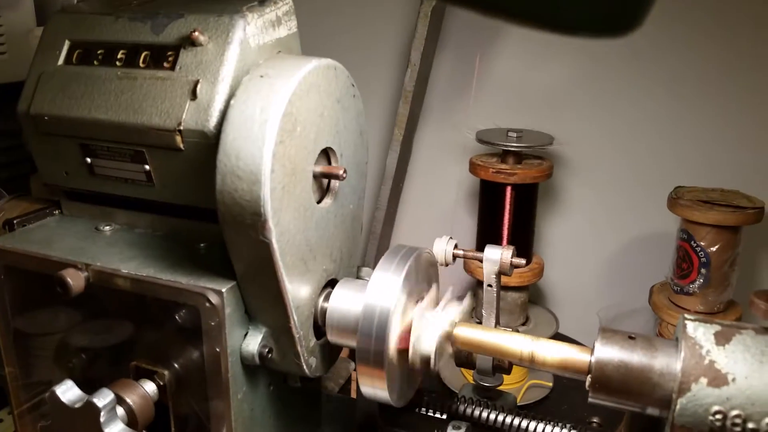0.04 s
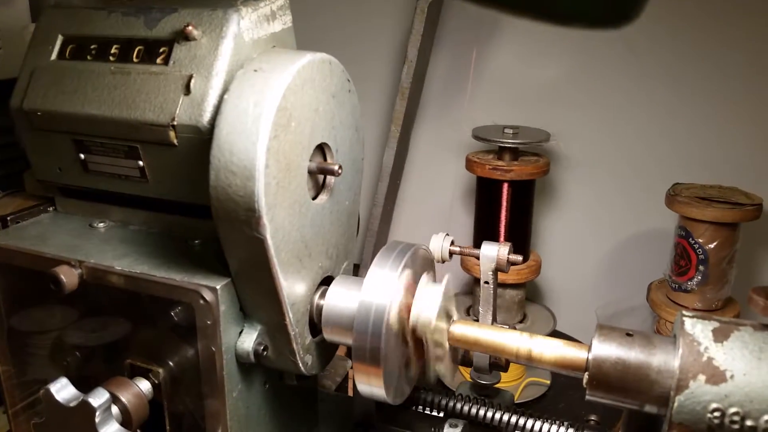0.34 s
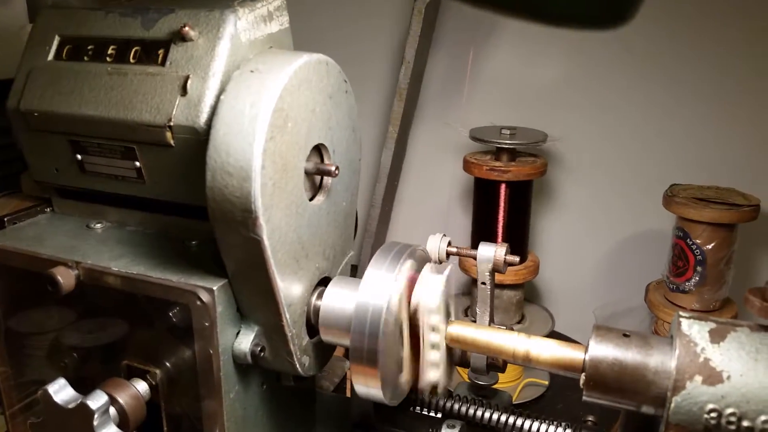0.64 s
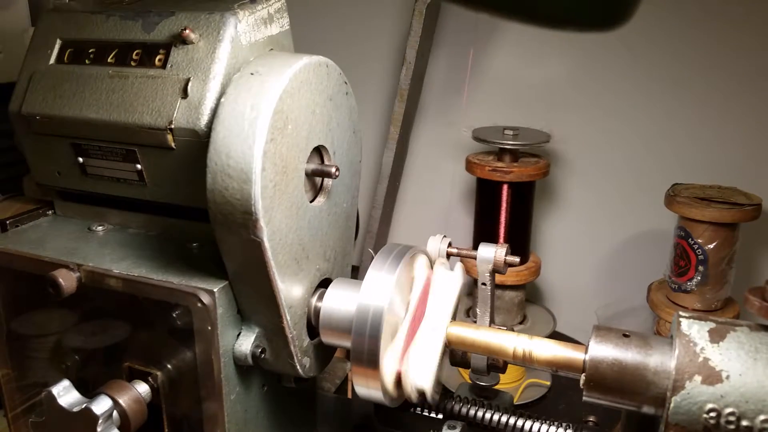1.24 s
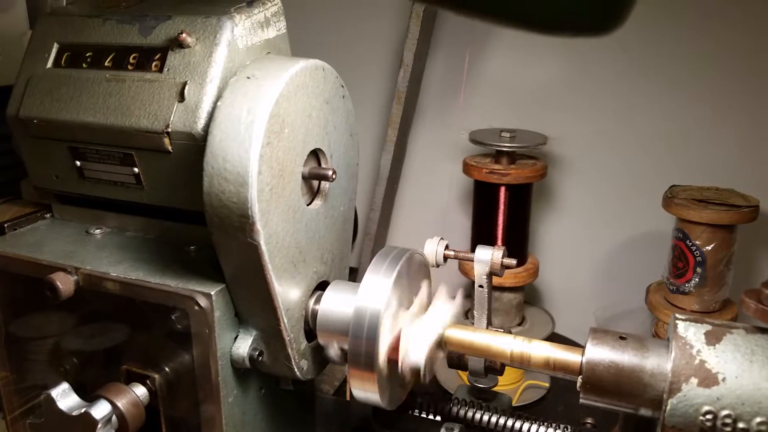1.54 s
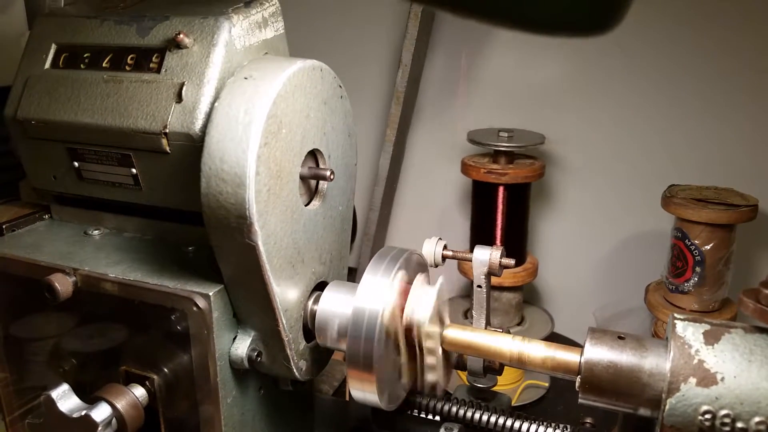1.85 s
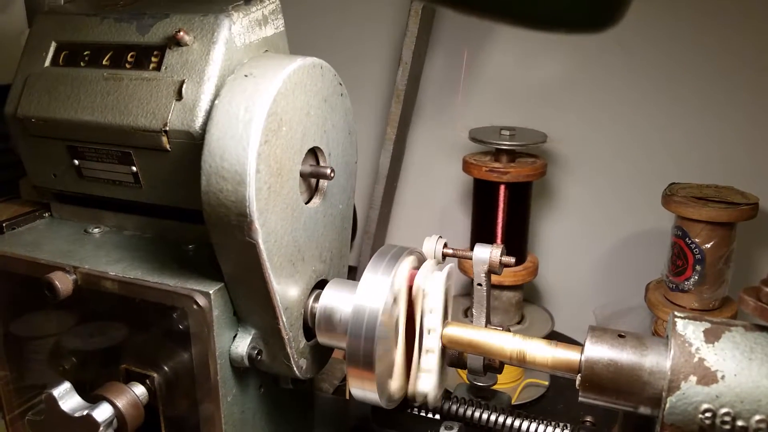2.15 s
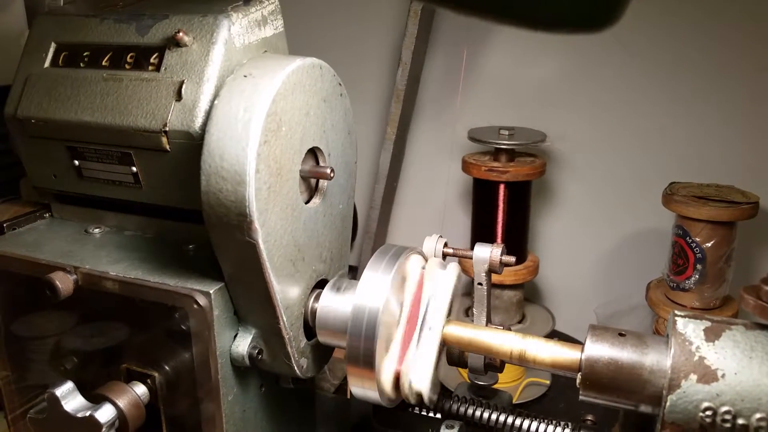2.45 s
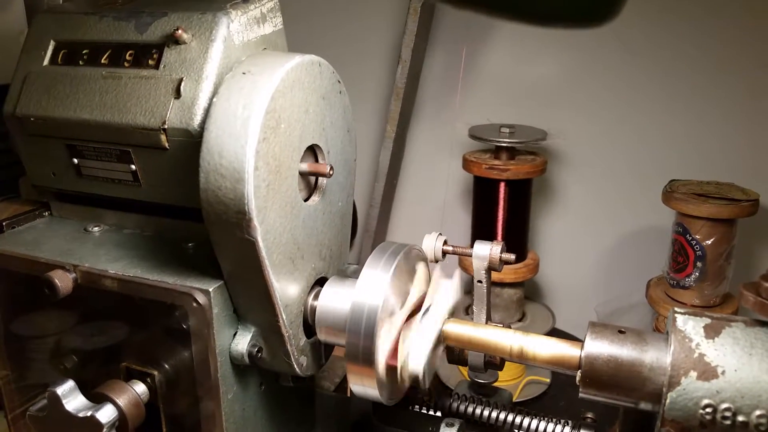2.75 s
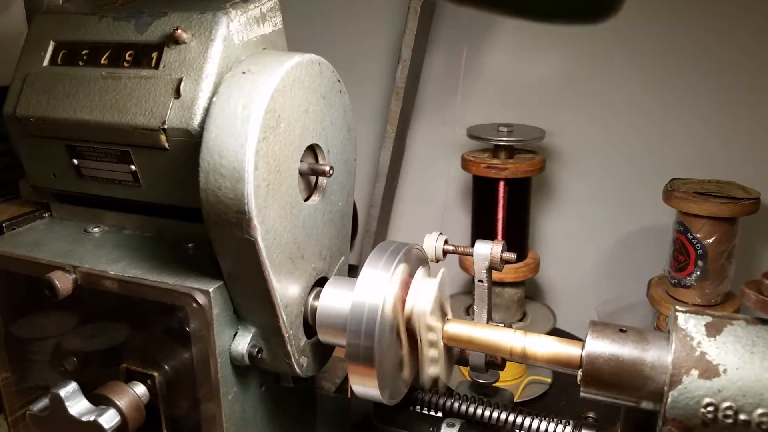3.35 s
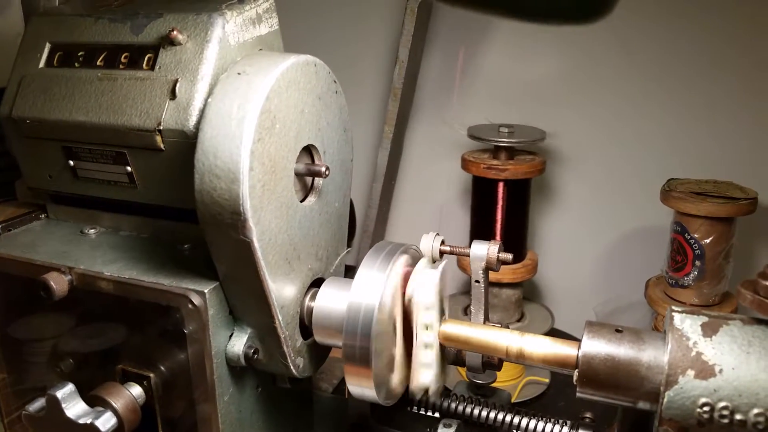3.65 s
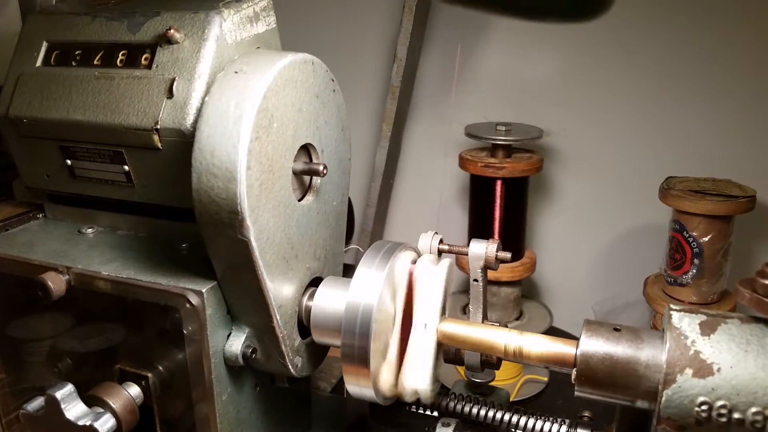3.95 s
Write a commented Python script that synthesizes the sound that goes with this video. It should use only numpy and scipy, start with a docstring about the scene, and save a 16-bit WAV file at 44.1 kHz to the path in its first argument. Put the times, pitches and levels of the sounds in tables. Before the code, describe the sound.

A small winding machine hums and whirs close by, its loose metal parts clicking and rattling.

```python
"""A motorised coil winder runs steadily, close by on a workshop bench.
Its motor hums, and the drive drones at a nearby pitch, so the two beat against each other.
The gears whine, knock and rumble through the cast housing, over the whir of the bearings.
Loose metal parts click unevenly and rattle once per stroke of the wire guide.
A thin hiss comes and goes, and a soft low bump passes once."""
import sys
import numpy as np
from scipy import signal
from scipy.fft import rfft, irfft
from scipy.io import wavfile

SR = 44100
rng = np.random.default_rng(int(sys.argv[2]) if len(sys.argv) > 2 else 0)


def wav_out(sig):
    """Save sig, one row per channel (or a flat mono array), as 16-bit PCM at SR to the path in sys.argv[1]."""
    wavfile.write(sys.argv[1], SR, np.round(np.clip(np.atleast_2d(sig).T, -1, 1) * 32767).astype(np.int16))


N = 176400
TIME = np.arange(N) / SR
MACHINE_PAN_DB = -1.34   # a pan is left level minus right level, so this is slightly to the right

# Sharp clicks of loose metal. Each row: start in seconds, relative level of the tick in dB,
# relative level of the ring and clack in dB.
CLICKS = [(0.127, -31.5, -64), (0.1685, -25.5, -62), (0.195, -28, -46), (0.3355, -18.5, -33),
          (0.4294, -22, -38.5), (0.4662, -30.5, -47.5), (0.5363, -23, -39), (0.656, -30, -41),
          (0.7422, -21, -38), (0.7788, -25.5, -49), (0.83, -26.5, -41), (0.875, -43, -45.5),
          (1.036, -23.5, -38.5), (1.0959, -22.5, -37), (1.155, -43, -44), (1.2504, -31, -42),
          (1.3573, -29, -46), (1.374, -32, -44), (1.3883, -30, -50), (1.4269, -26.5, -45),
          (1.4547, -51, -42), (1.5289, -33.5, -46), (1.5464, -41, -53), (1.6495, -22.5, -39),
          (1.829, -41, -48.5), (1.944, -25.5, -44), (1.9586, -29, -40.5), (2.022, -32, -47),
          (2.0421, -25, -41), (2.142, -42, -49.5), (2.3022, -27.5, -55), (2.3109, -30, -39),
          (2.3311, -34, -45.5), (2.527, -27, -47), (2.5831, -32, -56), (2.594, -34, -45),
          (2.713, -34.5, -39.5), (2.851, -23.5, -38.5), (2.8913, -26, -46), (2.9153, -29, -51),
          (2.945, -44, -38.5), (3.025, -34.5, -41), (3.1554, -30, -50), (3.1842, -26, -40),
          (3.2398, -26, -44.5), (3.27, -36.5, -45), (3.4144, -34, -39.5), (3.456, -26, -41),
          (3.49, -28, -48), (3.5414, -29.5, -47), (3.6499, -29, -46), (3.6666, -26, -37),
          (3.7626, -29, -46.5), (3.8132, -29, -45.5), (3.8271, -28.5, -45), (3.879, -35, -42)]


def from_db(db):
    """Turn decibels into a number to multiply a sound by."""
    return 10 ** (np.asarray(db) / 20)


def rms_one(x):
    """Scale a signal so that its average power is 1."""
    return x / np.sqrt(np.mean(np.abs(x) ** 2) + 1e-20)


def pan(db):
    """Left and right gains that make the left ear db louder than the right."""
    return from_db(np.array([[.5], [-.5]]) * db)


def per_bin(points):
    """Join rows of (Hz, value) into a curve over every frequency of the spectrum."""
    hz, value = np.transpose(points)
    return np.interp(np.log(np.arange(N // 2 + 1) * SR / N + 1), np.log(hz), value)


def noise(spectrum, side_db, pan_db):
    """Stereo noise with a given tone colour; the lower side_db, the more alike the two ears are."""
    mid, side = rfft(rng.standard_normal((2, N)))
    width = from_db(side_db)
    pair = (mid + width * side * np.array([[1], [-1]])) / np.sqrt(1 + width ** 2)
    return rms_one(irfft(pair * from_db(per_bin(spectrum)) * pan(pan_db), N))


def flutter(width_hz):
    """A random wobble in strength and phase, as complex numbers; wider means faster."""
    hz = np.fft.fftfreq(N, 1 / SR)
    white = rng.standard_normal(N) + 1j * rng.standard_normal(N)
    return rms_one(np.fft.ifft(white / (1 + (2 * hz / width_hz) ** 2)))


def swell(t, rise, hold, fall):
    """A level that rises, holds and falls, with all times in seconds."""
    return np.clip(np.minimum(t / rise, (rise + hold + fall - t) / fall), 0, 1)


def impulses(starts, sizes):
    """One spike at each start time in seconds."""
    return np.bincount(np.clip(starts * SR, 0, N - 1).astype(int), sizes, N)


def dying(power, t60):
    """Energy that dies away after each hit, falling 60 dB in t60 seconds."""
    return signal.lfilter([1], [1, -from_db(-60 / (t60 * SR)) ** 2], power + 1e-18)


def ring(hits, hz, t60):
    """Each hit starts a fading tone, like one natural note of a piece of metal."""
    decay, step = from_db(-60 / (t60 * SR)), 2 * np.pi * hz / SR
    return signal.lfilter([.5, 0, -.5], [1, -2 * decay * np.cos(step), decay ** 2], hits + 1e-18)


def resonance(hz, width_hz, lead, evenness=0):
    """A randomly shaken note; the left ear is ahead by lead radians, and evenness steadies the level."""
    sides, shake = np.array([[1], [-1]]), flutter(width_hz)
    shake = shake / np.abs(shake) ** evenness
    heard = shake * np.exp(.5j * lead * sides) + from_db(-20) * flutter(width_hz) * sides
    return rms_one(np.real(heard * np.exp(2j * np.pi * hz * TIME)))


def thin_hiss():
    """A faint hiss, as of running wire, comes and goes."""
    # Each row: time in seconds, hiss level in dB.
    levels = [(0,-69),(.65,-60),(1.2,-73),(1.8,-60.5),(2.2,-71),(4,-69)]
    level = from_db(np.interp(TIME, *np.transpose(levels)))
    return level * resonance(hz=6250, width_hz=1800, lead=np.pi / 2) * pan(-9)


def bump():
    """One brief, soft, very low rumble."""
    # Tone colour of the bump. Each row: frequency in Hz, relative level in dB.
    colour = [(28,-6),(52,9),(72,-2),(110,-32),(400,-72)]
    level = from_db(-41) * swell(TIME - 2.615, rise=.023, hold=.15, fall=.13)
    return level * noise(colour, side_db=-12, pan_db=0)


def whir():
    """Running gears and bearings make a broad noise that flickers quickly."""
    # Tone colour of the whir. Each row: frequency in Hz, relative level in dB.
    colour = [(45,-22),(80,-13.5),(130,2),(195,-2),(300,-2.5),(460,-2.5),(650,-10),(930,-8.5),(1700,-11.5),(2500,-12),(2750,-13.5),(3100,-25),(5000,-26),(8000,-32.5),(10300,-18.5),(13000,-23),(16000,-25.5)]
    # Stereo width. Each row: frequency in Hz, level in dB of what differs between the ears
    # compared with what they share.
    widths = [(60,-17),(150,-28),(300,-5),(600,-13),(1200,-3.5),(2000,4),(10000,-0.5)]
    # Each row: frequency in Hz, pan in dB.
    pans = [(60,4),(500,-1.5),(1200,0.5),(2200,-10.5),(4000,-4),(6500,-7),(9000,1.5),(11000,-4.5),(15000,0)]
    flicker_db = 2 * rms_one(flutter(width_hz=54).real)
    return from_db(-44 + flicker_db) * noise(colour, per_bin(widths), per_bin(pans))


def knocks():
    """Now and then the gears knock dully."""
    # Each row: start of a knock in seconds, level in dB.
    hits = [(.336,-42),(.428,-38),(1.384,-42),(2.036,-40),(2.31,-45),(3.965,-52)]
    # Tone colour of a knock. Each row: frequency in Hz, relative level in dB.
    colour = [(120,-31),(260,-1),(400,10.5),(720,-5.5),(2000,-34)]
    level = sum(from_db(db) * swell(TIME - s, rise=.0085, hold=.013, fall=.028) for s, db in hits)
    return level * noise(colour, side_db=-11, pan_db=MACHINE_PAN_DB)


def rattle_hits(rattles_per_s=220, strays_per_s=39):
    """Energy of tiny hits: each stroke of the wire guide shakes light parts, with stray ticks between."""
    # The start of each stroke in seconds, about 0.3 seconds apart.
    strokes = [.165, .452, .775, 1.094, 1.368, 1.662, 1.95, 2.302, 2.584, 2.885, 3.19, 3.495, 3.79]
    shaking = sum(swell(TIME - s, rise=.012, hold=.041, fall=.05) for s in strokes)
    cluster = from_db(-43) * (rng.random(N) < shaking * rattles_per_s / SR)
    stray = from_db(-50) * (rng.random(N) < strays_per_s / SR)
    scatter = from_db(4.5 * rng.standard_normal(N))
    return ((cluster + stray) * scatter) ** 2


def steel_ripple(depth_db=4, spacing_hz=131.1):
    """A steel part's many notes put random peaks and dips in its spectrum, different at each ear."""
    heights = rng.standard_normal((2, 600))
    place = np.arange(N // 2 + 1) * SR / N / spacing_hz
    return from_db(depth_db * np.array([np.interp(place, np.arange(len(ear)), ear) for ear in heights]))


def ticks(power, colour, t60, room_db, parts=6):
    """Each hit lands on one of several steel parts: a snap, a gritty burst, then the room's echo."""
    # Where the steel is heard. Each row: frequency in Hz, pan in dB.
    pans = [(1000,-6),(2500,-4),(4500,-7),(7000,-8),(9000,-6.5),(10000,8),(11000,-36),(12500,7),(15000,-13.5)]
    near, far = (noise(colour, 0, share * per_bin(pans)) for share in (1, .8))
    grit = rms_one(from_db(.5 * rms_one(flutter(width_hz=900).real)))
    spectrum, part_hit, burst = rfft(near), rng.integers(0, parts, N), 0
    for part in range(parts):
        struck = power * (part_hit == part)
        snap = from_db(-18) ** 2 * dying(struck, t60=.0034)
        level = np.sqrt(dying(struck, t60) + snap)
        burst = burst + level * rms_one(irfft(spectrum * steel_ripple(), N))
    room = from_db(room_db) * np.sqrt(dying(power, t60=.21)) * far
    return burst * grit + room


def jingle(power):
    """Every hit also rings the metal's highest notes, each with a strength of its own."""
    # Each row: pitch in Hz, relative level in dB.
    notes = [(8890,-3.5),(9940,0.5),(10440,1.5),(10745,-0.5),(10930,-4),(11140,-9),(11930,-1),(12280,-2),(13420,-5)]
    out, at = np.zeros((2, N)), np.flatnonzero(power)
    scatter, sign = np.moveaxis(rng.standard_normal((len(at), 2, len(notes), 2)), 0, -1)
    for k, (hz, db) in enumerate(notes):
        for ear in range(2):
            strength = from_db(db - 16.5 + 2 * scatter[k, ear])
            sizes = np.sqrt(power[at]) * np.sign(sign[k, ear]) * strength
            out[ear] += ring(impulses(at / SR, sizes), hz, t60=.038)
    return out * pan(9.5)


def ringing():
    """The clicks ring a loose metal part; its notes vary in strength and slightly in pitch each time."""
    # Each row: pitch in Hz, relative level in dB, seconds to fade by 60 dB.
    notes = [(762,-8.5,0.064),(1274,-12.5,0.11),(1542,-15,0.068),(2100,-22,0.07),(2350,-4,0.074),(2456,-1.5,0.089),(2590,-6.5,0.098),(3940,-19,0.086)]
    out, t = np.zeros((2, N + SR)), TIME[:SR // 10]
    hz, note_db, t60 = np.transpose(notes)[:, :, None]
    for s, _, db in CLICKS:
        strength, detune = rng.standard_normal((2, len(hz), 1))
        cycles = hz * (1 + .013 * detune) * t + rng.random((2, len(hz), 1))
        level = from_db(db - 4 + note_db + 5 * strength - 60 * t / t60)
        start = int(s * SR)
        out[:, start:start + len(t)] += np.sum(level * np.sin(2 * np.pi * cycles), axis=1)
    return out[:, :N] * pan(-11.5)


def clacks(level_db=-6.5, pan_db=-3.5):
    """The clicks carry into the cast housing: a hard crack, then a short dull tail."""
    # Tone colour of the crack. Each row: frequency in Hz, relative level in dB.
    crack_colour = [(500,-20),(1300,-1),(2600,1.5),(3600,-13)]
    # Tone colour of the housing's tail. Each row: frequency in Hz, relative level in dB.
    tail_colour = [(150,-35),(450,6.5),(800,8),(1000,-19),(1300,-1),(1900,-8.5),(2600,-4),(3200,-6),(8000,-49)]
    starts, _, db = np.transpose(CLICKS)
    power = impulses(starts, from_db(db) ** 2)
    crack = np.sqrt(dying(power, t60=.043)) * noise(crack_colour, 0, pan_db)
    tail = np.sqrt(dying(power, t60=.28)) * noise(tail_colour, 0, pan_db)
    return from_db(level_db) * (crack + tail)


def loose_parts():
    """Loose metal makes hard clicks and a lighter, higher rattle; both set off a jingle."""
    # Tone colour of the clicking steel. Each row: frequency in Hz, relative level in dB.
    steel_colour = [(100,-33),(500,-5),(1200,-8.5),(2500,-9.5),(3100,-9.5),(4200,-7),(5200,-16),(6600,-9),(7700,-9),(9200,-4),(10200,2.5),(11100,-4),(12800,-1.5),(14200,-2.5),(15600,-5)]
    # Tone colour of the light rattling parts. Each row: frequency in Hz, relative level in dB.
    rattle_colour = [(200,-24),(2400,0),(3200,-5.5),(5200,-13),(6500,-6.5),(8000,-16),(9400,-4),(10900,-6.5),(12500,3),(14200,0),(15600,-4)]
    starts, db, _ = np.transpose(CLICKS)
    hard, light = impulses(starts, from_db(db - 4.5) ** 2), rattle_hits()
    clicks = ticks(hard, steel_colour, t60=.042, room_db=-6) + clacks() + ringing()
    rattle = ticks(light, rattle_colour, t60=.018, room_db=-12)
    return clicks + rattle + jingle(hard + light)


def gear_load(spindle_hz=7.36, heaviest_s=.024):
    """The load on the gears rises and falls once per turn of the spindle."""
    return np.cos(2 * np.pi * spindle_hz * (TIME - heaviest_s))


def gear_rumble():
    """The gears shake the housing, and its notes above 300 Hz swell with every turn."""
    # The housing's notes. Each row: pitch in Hz, width in Hz, level in dB, left ear's lead in radians.
    notes = [(51,8.5,-56.5,0.15),(111.2,14,-45,-0.012),(148,17,-48.5,0.21),(176,12,-57,0.84),(223.9,17.6,-45.5,0.17),(249,24,-44,-0.29),(284,27,-49.5,-0.095),(356.5,93,-50.5,-0.16),(399.6,23,-51,0.19),(513.4,40,-50.5,1.18),(545,35.5,-50.5,0.19),(838.5,43,-57.5,-0.22),(1223,29,-61,1.6)]
    churn = rms_one(from_db(2.5 * gear_load()))
    return sum(from_db(db) * resonance(hz, width, lead) * (churn if hz > 300 else 1)
               for hz, width, db, lead in notes)


def gear_whine(throb_hz=15, throb_db=2.5):
    """The gears whine on two close tones that throb unevenly and swell a little with the load."""
    # Each row: pitch in Hz, width in Hz, relative level in dB.
    tones = [(1011.7,20.5,-0.64),(1033,46,-5)]
    # Each row: time in seconds, overall level of the whine in dB.
    levels = [(.02,-41.5),(.1,-54),(.22,-41.5),(.6,-48.5),(.92,-43),(1.35,-46),(1.8,-43.5),(2.02,-46.5),(2.45,-44),(2.59,-49),(2.7,-44),(3.3,-45),(3.9,-43.5)]
    whine = sum(from_db(db) * resonance(hz, width, lead=1.6, evenness=.41) for hz, width, db in tones)
    throb = np.cos(2 * np.pi * throb_hz * TIME + np.angle(flutter(width_hz=9.6)))
    swing = rms_one(from_db(throb_db * throb + gear_load()))
    return from_db(np.interp(TIME, *np.transpose(levels))) * swing * whine


def motor(roughness=.33):
    """The motor hums steadily, and the wavering drone of the drive beats against it."""
    # Hum from the motor's turning and the mains. Each row: pitch in Hz, level in dB.
    hum_tones = [(58.9,-59),(120,-42),(180,-54.5),(240,-47.5),(300,-61.5)]
    # The drive's drone. Each row: time in seconds, pitch in Hz, relative level in dB.
    drone_path = [(0.0, 103.4, -38), (0.09, 101.4, -40), (0.23, 111.4, -48), (0.62, 100.7, -36.5),
                  (0.65, 102.1, -49), (1.01, 104.8, -34.5), (1.111, 109, -39.5), (1.46, 106.1, -40.5),
                  (1.54, 107.3, -46.5), (2.32, 108.5, -38.5), (2.42, 111.1, -47.5), (2.52, 105.9, -34.5),
                  (2.669, 110.9, -65), (2.75, 103.6, -39), (3.45, 104, -41), (3.6, 112.4, -56),
                  (3.71, 107.4, -39.5), (4.0, 103.7, -41)]
    hum = sum(from_db(db) * np.sin(2 * np.pi * (hz * TIME + rng.random())) for hz, db in hum_tones)
    times, hz, db = np.transpose(drone_path)
    tone = np.exp(2j * np.pi * np.cumsum(np.interp(TIME, times, hz)) / SR)
    drone = rms_one(np.real(tone * (1 + roughness * flutter(width_hz=27))))
    return np.sqrt(2) * hum + from_db(2.5 + np.interp(TIME, times, db)) * drone


def scene():
    """The whole coil winder, in stereo."""
    machine = (motor() + gear_rumble() + gear_whine()) * pan(MACHINE_PAN_DB)
    return machine + whir() + thin_hiss() + knocks() + bump() + loose_parts()


def record(dry):
    """Cut the treble steeply above 16000 Hz."""
    return signal.sosfilt(signal.ellip(10, .2, 80, 16000, fs=SR, output="sos"), dry)


dry = scene()
out = record(dry)
wav_out(out)
```